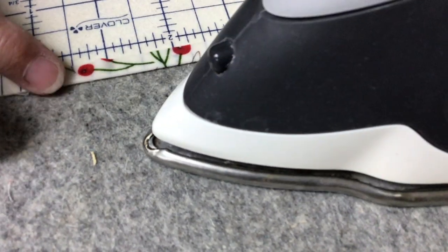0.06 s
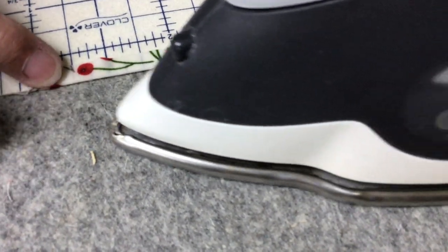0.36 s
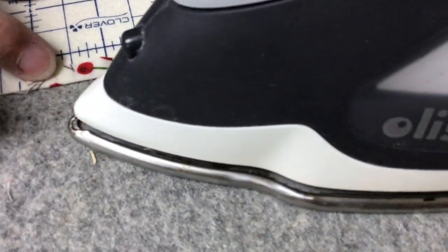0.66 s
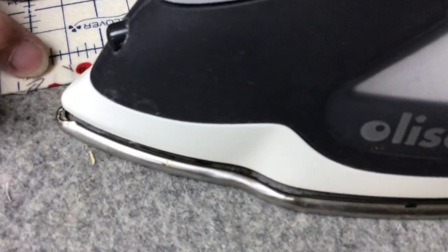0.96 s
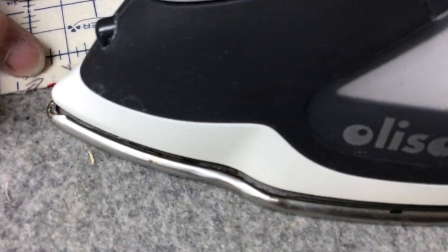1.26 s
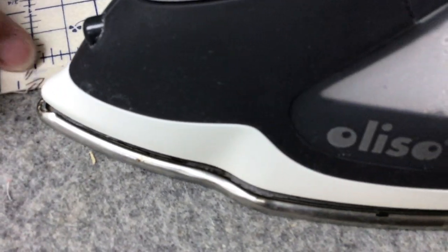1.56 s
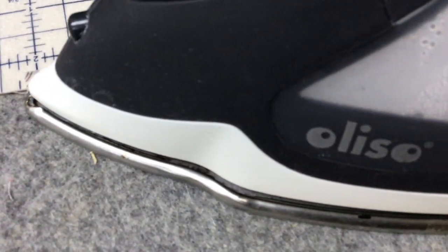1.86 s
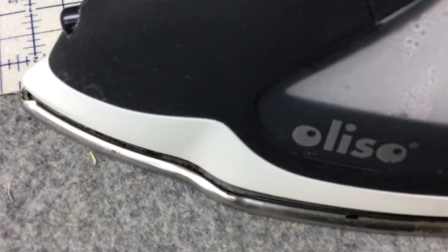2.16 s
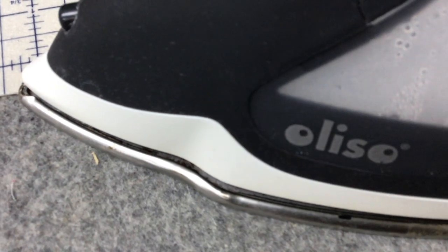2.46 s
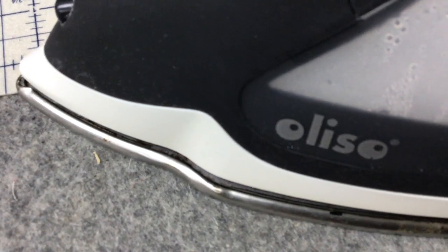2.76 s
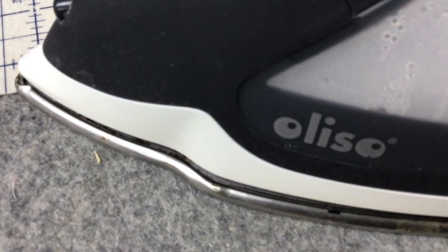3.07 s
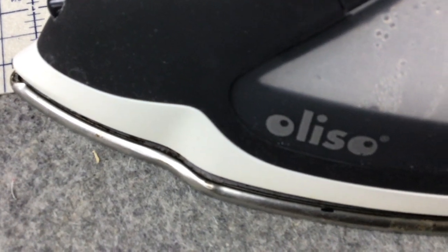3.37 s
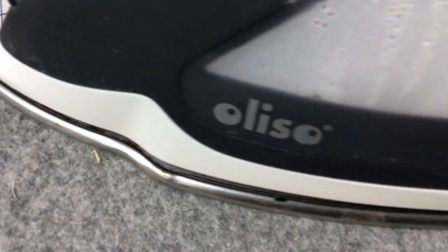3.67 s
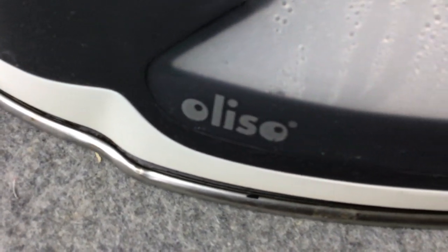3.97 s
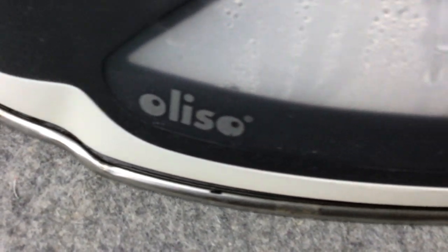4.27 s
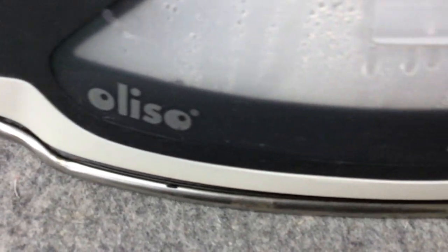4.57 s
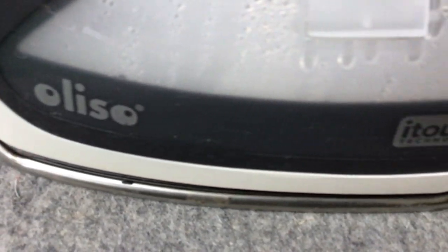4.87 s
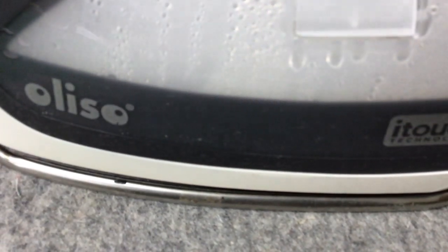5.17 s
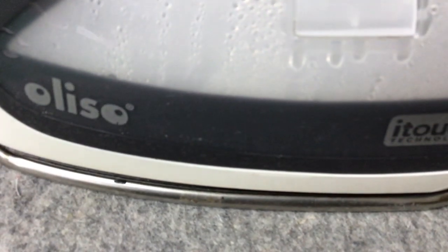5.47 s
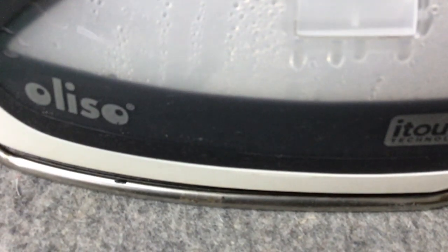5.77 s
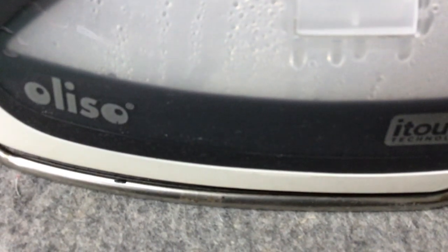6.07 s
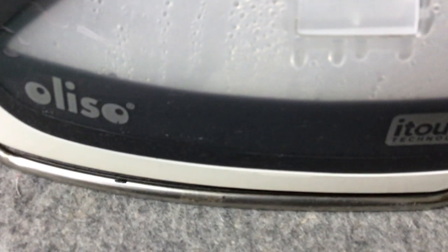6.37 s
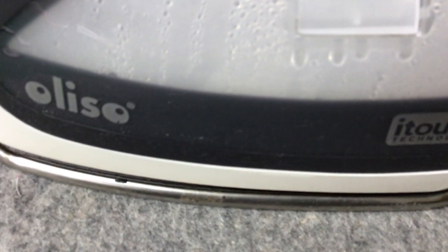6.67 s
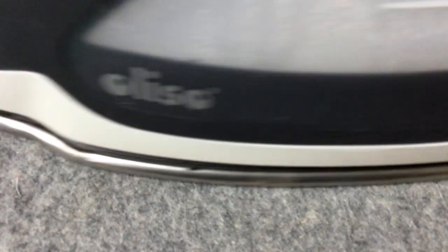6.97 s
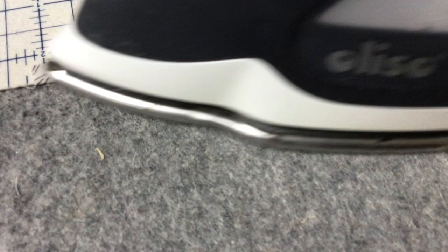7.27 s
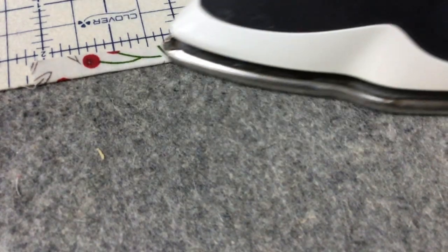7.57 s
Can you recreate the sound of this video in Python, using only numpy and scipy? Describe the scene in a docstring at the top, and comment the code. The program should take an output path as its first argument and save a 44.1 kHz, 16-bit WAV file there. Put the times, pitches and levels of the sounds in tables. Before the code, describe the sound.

A steam iron hisses and sputters on damp cloth, fades to a ticking sizzle, then slides softly away.

```python
"""Steam iron on cloth

A hot iron is pushed over cloth on a wool mat, close by. A turbulent jet hisses from under the sole
while water flashes to steam and thumps the boiler. The hiss dies to a sizzle with ticks of bursting
drops, the valve clacks in the plastic shell, and the sole slides back, rubbing the fibres.
A quiet room rumbles behind."""
import sys
import numpy as np
from scipy import signal
from scipy.fft import rfft, irfft, next_fast_len
from scipy.io import wavfile
from scipy.ndimage import uniform_filter1d, map_coordinates

SR = 44100
rng = np.random.default_rng(int(sys.argv[2]) if len(sys.argv) > 2 else 0)


def transcribe(signal):
    """Save signal, clipped to [-1, 1], as a 16-bit WAV file at the path in sys.argv[1]."""
    frames = np.atleast_2d(signal).T
    limited = np.clip(frames, -1, 1)
    pcm = np.round(limited * 32767).astype(np.int16)
    wavfile.write(sys.argv[1], SR, pcm)


N = 345303
TIME = np.arange(N) / SR
STOP_S = 0.054  # t60 of the friction once a push ends

# strength of the jet under the sole: time_s, level_db
JET_LEVELS = [(0.36, -73), (0.38, -69.5), (0.56, -58.5), (0.57, -53), (0.88, -46), (1.57, -43), (1.97, -48),
              (2.42, -45.5), (2.64, -49.5), (2.83, -42.5), (2.94, -47.5), (3.12, -47.5), (3.22, -52),
              (3.28, -49), (3.43, -51.5), (3.61, -44.5), (3.93, -51), (3.96, -48), (4.37, -51.5),
              (4.4, -62)]
# spectrum of water frying on hot metal: frequency_hz, level_db
FRYING_SPECTRUM = [(200, -35), (1000, -21), (3000, 1), (6000, -1), (9500, 2), (15500, -1)]
# spectrum of the hollow sigh of the vents: frequency_hz, level_db
SIGH_SPECTRUM = [(200, -16), (700, -6), (1400, -2), (3600, -2), (5000, -9), (9000, -27)]
# resonances and notches of the vents: centre_hz, width_hz, gain_db
VENT_PEAKS = [(1970, 460, 4.5), (2770, 230, -6), (3550, 470, 2.5), (7160, 550, 2), (9400, 700, 2),
              (10300, 550, -3), (11500, 760, 3), (12700, 800, -4), (13800, 550, 2), (14650, 500, 1)]
# pushes over the cloth, and one brief catch: start_s, length_s, rise_s, rub_db, hiss_db
STROKES = [(0, 0.4, 0.018, -81.5, -77), (0.34, 0.23, 0.055, -77.5, -72), (4.42, 0.56, 0.067, -66, -76.5),
           (4.856, 0.037, 0.029, -67, -59), (6.819, 1.05, .15, -66, -64.5)]


def steam():
    """Turbulent jet noise, filtered by the gap under the sole, whose resonances shift as the iron passes."""
    jet_spectrum = [(40, -55), (120, -12.5), (300, -10.5), (700.0, -6.5), (1300.0, -2.5), (3500.0, 0.0),
                    (7000.0, -6.5), (10000.0, -5), (15500.0, -8.5)]  # the jet's broad colour: frequency_hz, level_db
    spit_shares = [(0.5, 0.48), (0.9, 0.11), (1.6, 0.07), (2.1, 0.27), (2.6, 0.24), (3.3, 0.52), (3.7, 0.2),
                   (4.1, 0.28), (4.5, 0.46)]  # power carried by droplets: time_s, share (0-1)
    path = [(0.7, 0.5), (1.15, 1), (1.7, 1.5), (1.9, 2), (3.45, 2), (3.95, 3)]  # nearest part of the sole: time_s, part (0 edge, 1 tip, 2 middle, 3 heel)
    # resonances and notches of the gap at each place: centre_hz, width_hz, gain_db
    edge_peaks = [(1770, 360, 6), (2560, 300, -3), (3290, 460, 6), (4050, 340, -14), (5160, 500, 4),
                  (6830, 550, 10.5), (7600, 820, -6), (8650, 300, 2), (10400, 2200, 7), (12300, 830, 0),
                  (13800, 550, 7)]  # at the cloth's edge
    tip_peaks = [(1420, 1300, 0), (2550, 250, -7.5), (3130, 310, 4), (4031, 370, 7), (4200, 778, -2.5),
                 (4930, 410, 3.5), (7260, 2319, 8.0), (7550, 1380, -13.5), (9450, 430, -15),
                 (10200, 540, -11), (12100, 1774, -4), (14570, 1800, 12), (14600, 770, -12)]
    middle_peaks = [(600, 2200, 2), (854, 210, -4.5), (2510, 210, -5), (3150, 310, 4), (4080, 450, 5.5),
                    (4510, 520, -2.5), (5060, 460, 5), (5580, 210, -9), (6220, 550, 3.5), (7805, 570, -4.5),
                    (8360, 1300, 2.5), (12100, 2299, -3.5), (14254, 1007, -2)]
    heel_peaks = [(870, 240, -4.5), (1890, 240, 3), (4534, 600, -2.7), (5750, 243, -2), (6032, 236, -6),
                  (7270, 1100, -6.5), (9224, 4200, 2), (12700, 835, -3.7), (15700, 970, 1)]
    gaps = (edge_peaks, tip_peaks, middle_peaks, heel_peaks)
    gap_body_db = (-3.5, -2, 1, -0.7)
    full_flow_db = -44
    weakness_db = np.clip(full_flow_db - curves(JET_LEVELS)[0], -3, 12)
    place, = curves(path)
    spit, = curves(spit_shares)
    flutter = amp((0.26 + 1.2 * spit) * (wobble(35.1) + 0.84 * wobble(160)))  # wet steam flows unevenly
    flow = crackling(spit, rate=1800) * flutter
    jet = sum(np.clip(1 - np.abs(place - k), 0, 1) * coloured(flow, jet_spectrum, gap)
              for k, gap in enumerate(gaps))
    # a weaker jet is duller: it loses its hollow throat tone and gains low body
    throat = filtered(jet, lambda hz: np.exp(-((hz - 3500) / 800) ** 2))
    jet = jet + (amp(0.5 - 0.15 * weakness_db) - 1) * throat
    body, hiss = split(drifting(jet, depth_db=1.08), edge_hz=2500)
    body_db = np.interp(place, np.arange(len(gaps)), gap_body_db) + 0.22 * weakness_db
    return amp(1.18) * steam_flow() * (hiss + amp(body_db) * body)


def steam_flow():
    """The jet's amplitude envelope, with an exponential decay once the flow stops."""
    start, end = JET_LEVELS[0][0], JET_LEVELS[-1][0]
    return amp(curves(JET_LEVELS)[0]) * swell(start, end - start, attack_s=0.013, t60_s=0.087)


def boiler():
    """Flash boiling: each burst of steam excites the water chamber's modes and spurts from the vents."""
    hard_flashes = [(0.970, -45.5, -14), (1.004, -42.5, -17), (1.014, -45.5, -11), (1.175, -43, -10),
                    (1.372, -46, -12), (1.440, -44.5, -14), (1.586, -43.5, -11), (1.831, -54, -12),
                    (2.051, -45.5, 7.5), (2.095, -42, -8), (2.179, -46, -7), (2.231, -41, -13),
                    (2.291, -37.5, 1.5), (2.338, -41, -13), (2.394, -38.5, -8), (2.410, -42, -7),
                    (2.429, -39, -9), (2.452, -40.5, -12), (2.487, -42.5, -14), (2.644, -42, -11),
                    (2.713, -45.5, -1), (2.79, -41, -12), (2.854, -45, -12), (2.986, -38.5, -12),
                    (3.024, -36.5, -11), (3.085, -45.5, -14), (3.470, -44, -14)]  # water flashing to steam: start_s, level_db, spurt_relative_db
    chamber_modes = [(128.3, -13.5, 0.17), (182, -10.5, 0.098), (230, 0, 0.05), (309, 0.5, 0.1),
                     (570, -10, 0.064), (638, -10.5, 0.034)]  # the water chamber: pitch_hz, level_db, t60_s
    spurt_spectrum = [(100, -32), (440, -19), (580, 4), (800, -8), (1100, 4), (2000, -2.0),
                      (6000, -10), (15000, -16)]  # frequency_hz, level_db
    thumps, spurts = np.zeros((2, N))
    t = np.arange(SR // 20) / SR
    for start, db, spurt_db in hard_flashes + simmer(count=12):
        slosh = 1 + 0.022 * rng.standard_normal()  # the pitch varies from thump to thump
        modes = [(hz * slosh, level, t60) for hz, level, t60 in chamber_modes]
        add(thumps, start + 0.002, amp(db + 2.5) * ring(modes, attack_s=0.0023, vary_db=1.5))
        spurt = decay(t, 0.02) * rng.standard_normal(len(t))
        spurt[:3] += 2.7  # the first push of pressure
        add(spurts, start + 0.001006, amp(db + spurt_db + 4.5) * spurt)
    return thumps + filtered(spurts, lambda hz: colour(hz, spurt_spectrum))


def simmer(count, start_s=1.6, end_s=3.75, level_db=-54.5, spurt_db=-13):
    """Gentle boiling as a random process: rows of soft flashes, one in each equal slot of time."""
    return [(start_s + (end_s - start_s) * (k + when) / count, level_db + 6 * (size - 0.5), spurt_db)
            for k, (when, size) in enumerate(rng.random((count, 2)))]


def sizzle(start_s=4.38, level_db=-64, drying_db_per_s=10.5):
    """Evaporation: drops fry ever more faintly as the vents dry, and puffs of steam sigh through them."""
    puffs = [(4.404, 0.052, -57.5, -58.5), (4.479, 0.025, -59, -59), (4.551, .06, -71, -61),
             (4.973, 0.026, -58, -59.5), (5.025, 0.12, -66, -61.5), (5.545, .04, -71, -77),
             (5.622, 0.19, -70.5, -71), (5.88, .03, -77, -83), (6.022, .04, -75, -77)]  # the last water reaching hot metal: start_s, length_s, fizz_db, sigh_db
    attack_s, t60_s = 0.016, 0.14
    drying = swell(start_s, N / SR, attack_s, t60_s) * fading(start_s, drying_db_per_s)
    drying *= amp(1.7 * wobble(18))
    fizz_power = sigh_power = (amp(level_db) * drying) ** 2
    for start, length, fizz_db, sigh_db in puffs:
        puff = swell(start, length, attack_s, t60_s)
        fizz_power = fizz_power + (amp(fizz_db) * puff) ** 2
        sigh_power = sigh_power + (amp(sigh_db) * puff) ** 2
    flutter = amp(1.5 * wobble(70))
    fizz = coloured(crackling(0.6, rate=1100) * flutter, FRYING_SPECTRUM, VENT_PEAKS)
    sigh = coloured(crackling(0.3, rate=900) * flutter, SIGH_SPECTRUM, VENT_PEAKS)
    return np.sqrt(fizz_power) * fizz + amp(-1.0) * np.sqrt(sigh_power) * sigh


def ticks():
    """Impulse excitation: a bursting drop is a pulse trailed by fizz, sounding the hollow of the vents."""
    drops = [(2.7237, -26, -11.5), (4.3565, -37, -15), (4.6924, -43, -20), (4.7007, -39, -27),
             (4.9576, -45.5, -10), (5.1931, -42.5, -10), (5.2104, -48, -12), (5.2295, -42, -13),
             (5.3023, -47, -7), (5.3213, -48.5, -3.5), (5.4151, -45, -21), (5.4565, -50, -12),
             (5.4959, -48.5, -15), (5.5902, -46.5, -13.5), (5.884, -47, -20), (5.9294, -53, -21),
             (5.9678, -45.5, -27), (6.0023, -51, -20), (6.2223, -46, -28), (6.5799, -42.5, -36.5)]  # single drops bursting: start_s, level_db, hollow_weight_db
    sharp, hollow = np.zeros((2, N))
    t = np.arange(SR // 30) / SR
    for start, db, hollow_db in drops:
        burst = (0.14 * decay(t, 0.006) + 0.048 * decay(t, 0.052)) * rng.standard_normal(len(t))
        burst[0] = 1
        add(sharp, start + 0.001, amp(db + 1.5) * burst)
        add(hollow, start + 0.001, amp(db + hollow_db + 23) * burst)
    sharp = filtered(sharp, lambda hz: colour(hz, FRYING_SPECTRUM, VENT_PEAKS))
    hollow = filtered(hollow, lambda hz: colour(hz, SIGH_SPECTRUM, VENT_PEAKS))
    return sharp + hollow


def valve():
    """Impact noise: the valve gives a dull crack and a loose rattle, and the shell's modes ring briefly."""
    clacks = [(0.062, -63, 2), (4.504, -51, 7), (5.2353, -47, 13), (5.3942, -42, -4), (6.756, -43.5, -1)]  # blows of the valve: start_s, level_db, low_mode_gain_db
    shell_modes = [(199.4, -7.5, 0.25), (412, -11.5, .11), (546, -7, 0.11), (623, -11.5, 0.11),
                   (890, -7.5, 0.051), (1073, -3.5, 0.036), (1180, -10, 0.029), (1650, -11, 0.053),
                   (2300, -15, 0.044), (3180, -10.5, 0.018)]  # the plastic shell: pitch_hz, level_db, t60_s
    # frequency_hz, level_db
    crack_spectrum = [(150, -5), (500, 2.5), (1100, 12), (1500, 0), (3300, -12), (5000, -28)]
    rings, cracks = np.zeros((2, N))
    t = np.arange(SR // 8) / SR
    for start, db, low_db in clacks:
        onset = start + 0.00107
        modes = [(hz, level + low_db * (hz < 750), t60) for hz, level, t60 in shell_modes]
        add(rings, onset, amp(db) * ring(modes, attack_s=0.00011, vary_db=4.5))
        crack, rattle = decay(t, 0.012), 0.29 * decay(t, 0.14)
        add(cracks, onset, amp(db - 0.5) * (crack + rattle) * rng.standard_normal(len(t)))
    return rings + filtered(cracks, lambda hz: colour(hz, crack_spectrum))


def sliding():
    """Friction noise: the sole plucks countless fibres of the cloth; at speed a hiss joins the rub."""
    cloth_spectrum = [(200, -37), (560, -7), (880, -16.5), (1100, -6.5), (1500, -4.5), (2000, -2.5),
                      (2800, 1.5), (4000, -1), (4800, -4), (5700, -3), (7000, -9), (11000, -10.5),
                      (15800, -16)]  # rubbed fibres: frequency_hz, level_db
    fibres = drifting(crackling(0.16, rate=2500), depth_db=1.6) * amp(0.65 * wobble(30))
    rub, hiss = map(unit, split(coloured(fibres, cloth_spectrum), edge_hz=3060))
    friction = np.zeros(N)
    for start, length, rise, rub_db, hiss_db in STROKES:
        friction += amp(rub_db) * swell(start, length, rise, STOP_S) * rub
        # the hiss builds more slowly than the rub and fades as the push slows
        speed = swell(start, length, 1.96 * rise, STOP_S) * fading(start, db_per_s=3.5)
        friction += amp(hiss_db) * speed * hiss
    return friction


def sole(centre_hz=1880, width_hz=240):
    """Forced vibration: the steam and the start of each push drive one broad resonance of the plate."""
    tone = filtered(rng.standard_normal(N), lambda hz: 1 / (1 + (2 * (hz - centre_hz) / width_hz) ** 2))
    scrape = sum(amp(rub_db) * swell(start, length, rise, STOP_S) * fading(start, db_per_s=22)
                 for start, length, rise, rub_db, _ in STROKES)
    return (amp(-21.5) * steam_flow() + scrape) * unit(tone)


def room(x):
    """Reverberation: convolution with a noise tail in which each frequency dies at its own rate."""
    decay_times = [(200, 0.22), (2000, 0.24), (10000, 0.16)]  # reflections from the walls: frequency_hz, t60_s
    hz, t, spectra = signal.stft(rng.standard_normal(SR // 2), SR, nperseg=256)
    tail = signal.istft(spectra * decay(t, along(decay_times, hz)[:, None]), SR, nperseg=256)[1]
    return signal.fftconvolve(x, tail / np.linalg.norm(tail))[:N]


def background(room_db=-69.5, boiling_db=-20.5, air_db=-78):
    """Incoherent sources add in power: room, boiling water and shifting iron rumble under a thin hiss."""
    shifts = [(0, 0.49, -70), (3.04, 0.65, -63), (4.0, 0.19, -62), (4.945, .35, -66), (6.79, 1, -72.5)]  # the iron shifting its weight on the mat: start_s, length_s, level_db
    rumble_spectrum = [(30, -18), (60, -9.5), (90, -11.5), (125, 3), (160, -4), (210, 3.5), (300, 1),
                       (400, -12), (600, -17), (1200, -30)]  # low rumble: frequency_hz, level_db
    air_spectrum = [(260, -10), (450, -2.5), (854, -6), (1440, -4), (1570, -2.5), (2810, -6), (3160, -10),
                    (6000, -9), (6470, -10.5), (15800, -18)]  # the room's even hiss: frequency_hz, level_db
    power = amp(room_db) ** 2 + (amp(boiling_db) * steam_flow()) ** 2
    for start, length, db in shifts:
        power += (amp(db) * swell(start, length, attack_s=0.054, t60_s=0.29)) ** 2
    rumble = np.sqrt(power) * amp(1.3 * wobble(9)) * coloured(rng.standard_normal(N), rumble_spectrum)
    return rumble + amp(air_db) * coloured(rng.standard_normal(N), air_spectrum)


def ring(modes, attack_s, vary_db):
    """Modal superposition: one blow starts damped sines of randomly varied strength; peak 1."""
    t = np.arange(SR // 3) / SR
    y = sum(amp(db + vary_db * rng.standard_normal()) * decay(t, t60) * np.sin(2 * np.pi * hz * t)
            for hz, db, t60 in modes)
    y *= 1 - np.exp(-t / attack_s)
    return y / np.abs(y).max()


def crackling(share, rate):
    """Shot noise: uneven pops, rate a second, carry a share of the power; white noise has the rest."""
    size = amp(5 * np.clip(rng.standard_normal(N), -2, 1.7))
    pops = unit((rng.random(N) < rate / SR) * size * rng.choice([-1, 1], N))
    share = np.clip(share, 0, 1)
    return np.sqrt(share) * pops + np.sqrt(1 - share) * rng.standard_normal(N)


def drifting(x, depth_db):
    """Time-varying filtering: the gap keeps changing shape, so small spectral peaks come and go."""
    spectra = signal.stft(x, nperseg=512)[2]
    ripple = uniform_filter1d(rng.standard_normal(spectra.shape), size=4, axis=0)  # smooth in frequency
    ripple = uniform_filter1d(ripple, size=40, axis=1)  # and in time
    return signal.istft(spectra * amp(depth_db * unit(ripple)), nperseg=512)[1][:N]


def filtered(x, response):
    """Linear filtering: the spectrum of x times response(hz)."""
    size = next_fast_len(N + SR // 2)
    return irfft(rfft(x, size) * response(np.fft.rfftfreq(size, 1 / SR)), size)[..., :N]


def colour(hz, spectrum, peaks=()):
    """Frequency response of a broad spectrum with bell-shaped peaks and notches."""
    peaks_db = sum(db * np.exp(-(2 * (hz - centre) / width) ** 2) for centre, width, db in peaks)
    return amp(along(spectrum, hz) + peaks_db)


def coloured(x, spectrum, peaks=()):
    """Spectral shaping: x in that colour, at rms 1."""
    return unit(filtered(x, lambda hz: colour(hz, spectrum, peaks)))


def split(x, edge_hz):
    """A crossover: the parts of x below and above an edge."""
    low = filtered(x, lambda hz: 1 / (1 + (hz / edge_hz) ** 4))
    return low, x - low


def swell(start_s, length_s, attack_s, t60_s):
    """An envelope that rises linearly, holds until start_s + length_s and decays exponentially."""
    rise = np.clip((TIME - start_s) / attack_s, 0, 1)
    return rise * decay(np.maximum(TIME - start_s - length_s, 0), t60_s)


def decay(t, t60_s):
    """Exponential damping: 60 dB down after t60_s."""
    return amp(-60 * t / t60_s)


def fading(start_s, db_per_s):
    """A gain that falls exponentially from start_s on."""
    return amp(-db_per_s * np.maximum(TIME - start_s, 0))


def wobble(rate):
    """Random modulation: a smooth curve, rate knots a second."""
    return map_coordinates(rng.standard_normal(int(N * rate / SR) + 4), [TIME * rate])


def curves(rows):
    """Linear interpolation: one value per sample for each column after the time."""
    times, *columns = np.transpose(rows)
    return [np.interp(TIME, times, column) for column in columns]


def along(points, hz):
    """Interpolation of (frequency_hz, value) points on a log frequency axis."""
    frequencies, values = np.transpose(points)
    return np.interp(np.log(hz + 1), np.log(frequencies + 1), values)


def add(track, start_s, sound):
    """Superposition: mix a sound into the track at start_s."""
    part = track[max(round(start_s * SR), 0):][:len(sound)]
    part += sound[:len(part)]


def amp(db):
    """Decibels to amplitude gain."""
    return 10 ** (np.asarray(db) / 20)


def unit(x):
    """x normalised to rms 1."""
    return x / np.sqrt(np.mean(x ** 2) + 1e-20)


def scene():
    """Direct sound, faint reverberation and background sum at one point, which feeds both channels."""
    iron = steam() + boiler() + sizzle() + ticks() + valve() + sliding() + sole()
    mono = iron + amp(-18.5) * room(iron) + background()
    return np.array([mono, mono])


def record(dry):
    """Band limiting: the microphone drops the deep bass, and a sharp cut removes the highest treble."""
    bass_cut_hz, top_hz = 105, 15820
    thin = signal.sosfilt(signal.butter(3, bass_cut_hz, "high", fs=SR, output="sos"), dry)
    return filtered(thin, lambda hz: hz < top_hz)


dry = scene()
out = record(dry)
transcribe(out)
```